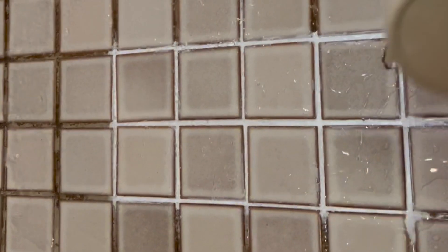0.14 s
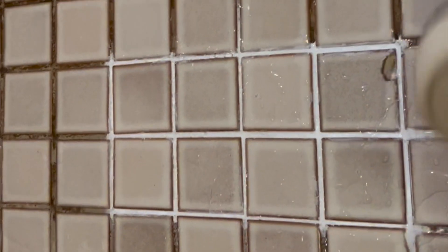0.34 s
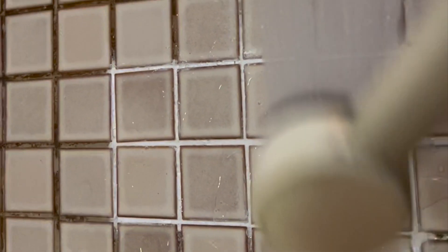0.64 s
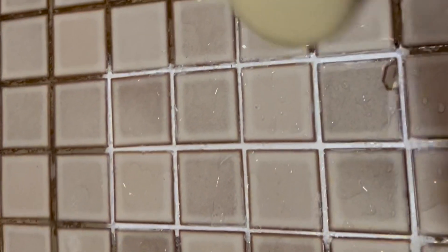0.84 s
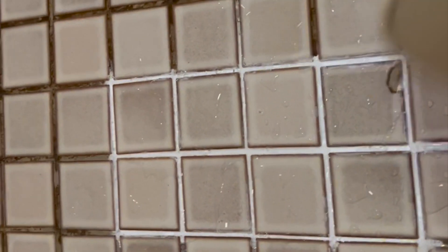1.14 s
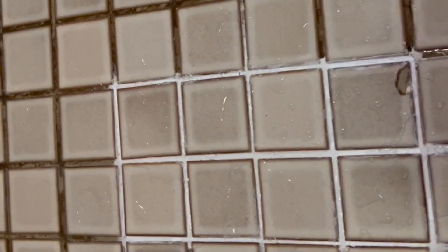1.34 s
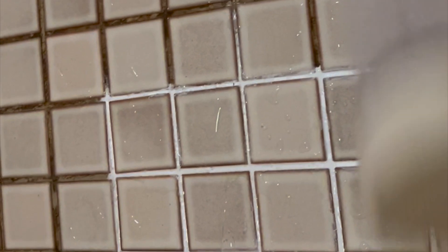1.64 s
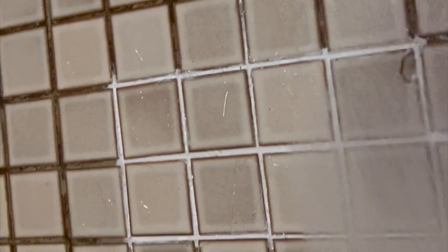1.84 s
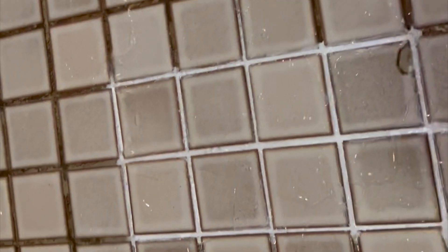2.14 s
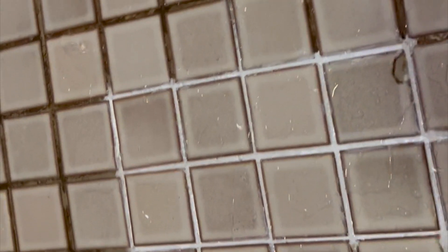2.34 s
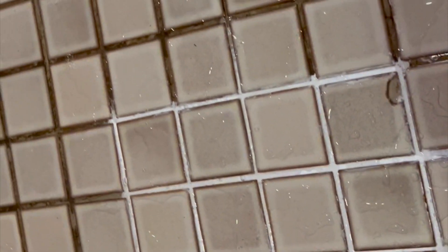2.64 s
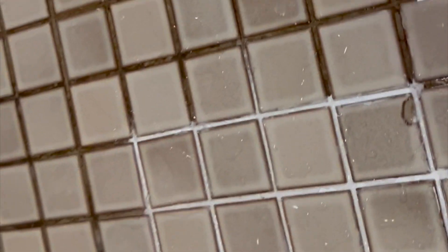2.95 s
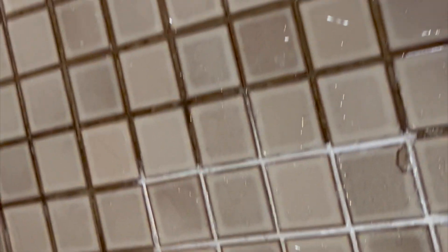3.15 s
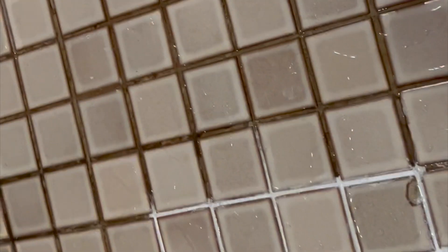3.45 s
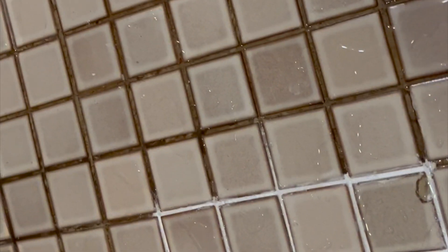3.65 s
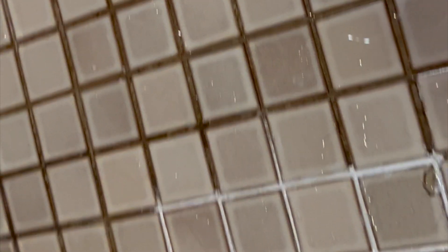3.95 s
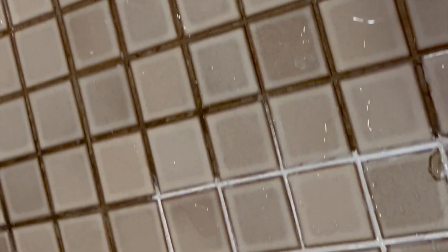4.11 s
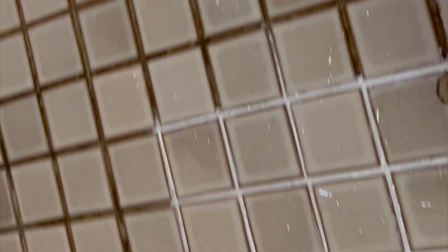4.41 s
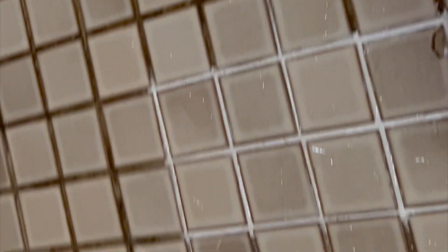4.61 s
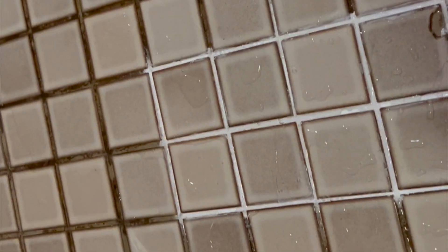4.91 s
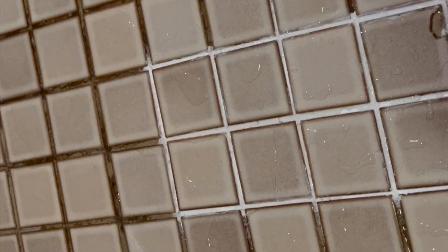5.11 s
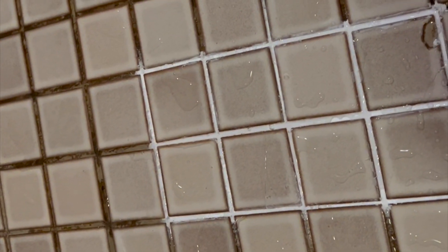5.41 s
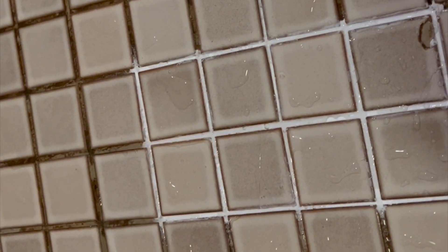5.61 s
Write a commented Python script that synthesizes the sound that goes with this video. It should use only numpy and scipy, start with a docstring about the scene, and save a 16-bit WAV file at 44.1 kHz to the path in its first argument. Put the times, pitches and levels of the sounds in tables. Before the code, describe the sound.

A shower hisses and patters in swells on bathroom tiles, then shuts off with sharp clacks, leaving drips and hollow plastic knocks in a boomy room.

```python
"""A shower hisses and patters on a tiled bathroom floor in swells, then is shut off; water drips and runs away.
A hollow plastic vessel knocks on the tiles, the valve clacks shut, and the small hard room booms and answers.
Water is shaped noise, lumpy in time and pitch; knocks are rough pushes into resonances; drops are short notes.
Two microphone ports hear it all with a phase, level and likeness that depend on frequency."""
import sys
import numpy as np
from scipy import signal
from scipy.fft import rfft, irfft, next_fast_len
from scipy.io import wavfile
from scipy.ndimage import uniform_filter1d

SR = 44100
rng = np.random.default_rng(int(sys.argv[2]) if len(sys.argv) > 2 else 0)


def to_wav(sig):
    """Store sig (one row per channel, or 1-D mono) as 16-bit WAV at the path in sys.argv[1].

    Samples outside -1..1 are clipped; the rate is SR.
    """
    pcm = np.clip(np.atleast_2d(sig), -1, 1) * 32767
    pcm = np.round(pcm).astype(np.int16)
    wavfile.write(sys.argv[1], SR, pcm.T)  # frames by channels


N = 254452

# the jet's strength: (time [s], mist level before the swells of the passes [dB])
FLOW = [(0, -31.5), (.24, -38.5), (.55, -37), (.9, -38), (1.14, -34), (1.3, -37), (1.42, -39.5),
        (1.56, -42.5), (1.68, -36), (1.85, -36), (2.2, -39), (2.38, -41.5), (2.6, -39.5), (2.9, -41),
        (3.17, -41), (3.28, -34.5), (3.4, -38), (3.49, -40), (3.52, -47), (3.57, -53.5), (3.64, -63.5),
        (3.75, -63)]
# passes of the jet across the near tiles: (peak time [s], build-up [s], leaving [s],
# mist swell [dB], patter level at the peak [dB], first pitch [Hz], last pitch [Hz])
PASSES = [(.13, 0.14, 0.13, -0.5, -48.5, 3800, 3130), (.31, 0.081, 0.061, 4, -70, 3600, 3600),
          (.47, 0.18, 0.025, 2.5, -55.5, 3700, 3600), (.78, 0.25, 0.081, 3.5, -43.5, 4300, 2920),
          (.97, 0.029, 0.26, 0.5, -55, 3620, 3600), (1.2, 0.065, 0.075, 5, -46.5, 3900, 3280),
          (1.27, 0.1, 0.17, -0.5, -37.5, 2780, 2500), (1.7, 0.03, 0.14, -1, -51.5, 2800, 2620),
          (1.952, 0.12, 0.081, 4, -45, 3340, 2060), (2.1, 0.3, 0.22, 4.5, -41.5, 3280, 3150),
          (2.318, 0.079, .03, 4.5, -46, 2850, 2660), (2.6, 0.013, .08, -2, -47.5, 2500, 2220),
          (3.07, 0.048, 0.088, -1.5, -54, 2740, 2520), (3.3, 0.047, 0.039, 1, -43, 3600, 3450),
          (3.465, 0.05, 0.067, 4, -42.5, 2800, 2420)]
# knocks of the vessel on the tiles and of the shutting valve: (time [s], crack [dB], hollow ring [dB],
# thud [dB], boom [dB], struck note [Hz], contact decay [s], crack dullness [dB per octave],
# ring damping [times its free width])
KNOCKS = [(.962, -41, -39, -51, -45, 1650, 0.028, 10, 0.82),
          (1.322, -35.5, -38, -38, -33.5, 1110, 0.0034, 15, 1.7),
          (2.1419, -23.5, -23, -31.5, -21, 1120, 0.0044, 4, 4.5),
          (2.1507, -31, -34, -36, -46, 1310, 0.01, 13, 3.3),
          (2.589, -50, -41, -54, -55, 1360, 0.031, -6.5, 1.1),
          (3.226, -30, -49, -25.5, -35, 1580, 0.0047, 9.5, 1.5),
          (3.299, -15.5, -37, -62, -29.5, 900, 0.003, 0.5, 1.6),
          (3.3016, -18.5, -38, -46, -39, 2040, 0.0058, 3, 1.5),
          (3.3085, -22.5, -27.5, -40, -48, 950, 0.0037, 1, 1.4),
          (3.317, -24, -36, -40.5, -49, 970, 0.012, 4, 1.5),
          (3.6106, -53, -47, -55, -42.5, 1370, 0.0077, 23, 1.5),
          (3.633, -67, -50, -70, -59, 1670, .012, 0, 1.2),
          (3.8843, -44, -48, -57, -54, 1360, 0.0037, 5.5, 0.88),
          (4.0917, -17.5, -23, -30, -44, 1480, 0.0015, 4, 0.67),
          (4.1056, -44, -23.5, -37.5, -40, 1670, 0.0041, 2, 0.47),
          (4.3026, -41, -45, -57, -54, 1670, 0.015, -17, .4),
          (4.303, -60, -43, -64, -60, 1360, .015, 5, 0.32), (4.31, -53, -49, -65, -60, 884, 0.016, 10, .6),
          (4.319, -61, -45, -70, -62, 355, 0.011, 12, 1.2),
          (4.356, -23.5, -21.5, -31.5, -24.5, 1150, 0.0039, 11, 2.8),
          (4.3718, -34, -31, -50, -46, 930, 0.007, 3, 4.3), (4.431, -44, -46, -46, -58, 355, 0.017, 6, 1.4),
          (4.569, -55, -46, -55, -62, 1420, 0.0045, 20, .7),
          (4.593, -54, -43, -66, -58, 1400, .01, 15, 1.6),
          (4.612, -39, -32, -48, -51, 1560, 0.008, 16, 1.9),
          (4.6344, -35.5, -30, -37.5, -52, 1160, 0.0044, 6, 1.4),
          (4.636, -58, -38.5, -49, -62, 1610, 0.0033, 2, 1.5),
          (4.662, -48, -35.5, -51, -60, 1180, 0.0032, 10, 1.2),
          (4.8443, -72, -51, -65, -73, 1020, 0.0037, 1, 1.2),
          (4.898, -64, -51, -57, -53, 1040, 0.006, 18, 0.75),
          (5.081, -43.5, -50, -57.5, -74, 910, 0.029, -4.5, 3.5),
          (5.12, -47, -44.5, -59, -64, 1100, 0.006, 13, 2.4),
          (5.19, -55, -50.5, -62, -66, 1540, 0.073, 20, 3.1),
          (5.3305, -36.5, -33, -43, -35.5, 960, 0.0025, 10.5, 1.6),
          (5.4002, -23.5, -18.5, -28.5, -37, 1040, 0.001, 4, 0.86),
          (5.425, -40, -33, -35.5, -48, 1040, .004, 8, 0.92),
          (5.463, -55, -34.5, -39, -47, 1040, 0.0083, 15, 1.1),
          (5.4992, -32.5, -33.5, -44, -33.5, 1130, 0.0039, 11, 1.8),
          (5.687, -58, -35, -54, -52, 1000, 0.0044, 25, 1.4)]
# left-over water running off: (time [s], guide level for the runoff and its droplets [dB])
TRICKLE = [(3.5, -47), (3.58, -56.5), (3.74, -64), (3.9, -61), (4.3, -61), (4.6, -60), (4.95, -69),
           (5.36, -61.5), (5.77, -70)]


def amp(db):
    """Gain of a level in dB."""
    return 10 ** (np.asarray(db) / 20)


def unit(x):
    """Bring x to rms 1."""
    return x / np.sqrt(np.mean(x ** 2) + 1e-20)


def peak(x):
    """Bring x to peak 1."""
    return x / np.abs(x).max()


def along(points, hz):
    """Read a curve of (Hz, value) points on a log frequency axis."""
    f, v = np.transpose(points)
    return np.interp(np.log(hz + 1), np.log(f + 1), v)


def spectrum(points):
    """Gain curve through (Hz, dB) points."""
    return lambda hz: amp(along(points, hz))


def automation(points):
    """Draw a line through (s, value) points, one value per sample."""
    s, value = np.transpose(points)
    return np.interp(np.arange(N) / SR, s, value)


def filtered(x, response):
    """Filter x by a complex response of frequency, zero-padded against wrap-around."""
    n = x.shape[-1]
    m = next_fast_len(n + 8192)
    return irfft(rfft(x, m) * response(np.fft.rfftfreq(m, 1 / SR)), m)[..., :n]


def modes(table):
    """Causal response of (Hz, width Hz, dB) resonances with alternating sign."""
    def response(f):
        total = 0
        for k, (centre, width, db) in enumerate(table):
            resonance = 1j * f * width / (centre * centre - f * f + 1j * f * width)
            total = total + (-1) ** k * amp(db) * resonance
        return total
    return response


def lumpy_noise(response, patchy_db, grainy_db):
    """Two strands of noise at rms 1: millisecond grains of random level, then patches in time and pitch."""
    lumps = uniform_filter1d(rng.standard_normal((2, N)), size=40, axis=1)
    grains = rng.standard_normal((2, N)) * amp(grainy_db * unit(lumps))
    z = signal.stft(grains, nperseg=512)[2]
    field = uniform_filter1d(rng.standard_normal(z.shape[1:]), size=8, axis=0)
    field = uniform_filter1d(field, size=10, axis=1)
    patched = signal.istft(z * amp(patchy_db * unit(field)), nperseg=512)[1][:, :N]
    return unit(filtered(patched, response))


def add(out, s, sound):
    """Mix a sound in from time s."""
    part = out[:, round(s * SR):][:, :sound.shape[1]]
    part += sound[:, :part.shape[1]]


def in_room(dry, wet_db):
    """Direct sound on the shared strand, plus a fresh diffuse tail on both as the tiles throw it back."""
    # decay of the tiled room: (frequency [Hz], time to fall 60 dB [s])
    decay = [(100, 0.46), (500, 0.31), (2000, 0.32), (6000, 0.25), (15000, 0.19)]
    hz, t, z = signal.stft(rng.standard_normal((2, len(dry))), SR, nperseg=256)
    fading = amp(-60 * t / along(decay, hz)[:, None])
    tail = signal.istft(z * fading, SR, nperseg=256)[1][:, :len(dry)]
    tail = np.pad(tail / np.linalg.norm(tail[0]), ((0, 0), (150, 0)))  # the tail starts 3.4 ms late
    wet = signal.fftconvolve(dry[None], tail, axes=1)[:, :len(dry)]
    return dry * [[1], [0]] + amp(wet_db) * wet


def nearness(t):
    """How far each pass of the jet has come at times t: 0 away, 1 at its peak."""
    return np.array([np.interp(t, [s - build, s, s + leave], [0, 1, 0])
                     for s, build, leave, *_ in PASSES])


def gliding(x):
    """Centre the patter on a pitch that slides as each pass moves over the floor."""
    times, pitches = [], []
    for top, build, leave, _, _, first_hz, last_hz in PASSES:
        times += [top - build, top + leave / 2]
        pitches += [first_hz, last_hz]
    hz, t, z = signal.stft(x, SR, nperseg=512)
    centre = np.interp(t, np.maximum.accumulate(times), pitches)
    octaves = np.log2((hz[:, None] + 1) / centre)
    gain_db = np.where(octaves < 0, 45 * octaves, -16 * octaves)  # steep below, a long skirt above
    return signal.istft(z * amp(gain_db), SR, nperseg=512)[1][:, :N]


def spray():
    """Fine mist hisses with the flow; drops striking the floor patter louder as the jet passes near."""
    # colour of the mist: (frequency [Hz], relative level per Hz [dB])
    mist_colour = [(900, -41), (1800, -10), (2600, -11.5), (3500, -10), (5500, -4.5), (7500, -1.5),
                   (9500, -4), (11500, 0.5), (14000, -6.5), (15800, -1)]
    patter_range_db, rest_patter_db = 6, -23  # extra swing in a pass; patter relative to flow between passes
    t = np.arange(N) / SR
    flow_db, near = automation(FLOW), nearness(t)
    swell_db, patter_db = np.transpose(PASSES)[3:5, :, None]
    running = np.arange(N) < FLOW[-1][0] * SR
    mist = lumpy_noise(spectrum(mist_colour), patchy_db=2.0, grainy_db=1.73)
    mist_level = amp(flow_db + (swell_db * near).sum(0))
    patter = unit(gliding(lumpy_noise(lambda f: f > 800, patchy_db=1.2, grainy_db=2)))
    pass_levels = np.sqrt(near) * amp(patter_db - patter_range_db * (1 - near))
    patter_level = amp(flow_db + rest_patter_db) + pass_levels.sum(0)
    return running * (mist_level * mist + patter_level * patter)


def knocks():
    """Each contact is a rough push: it cracks, rings hollow notes near the struck one and kicks the room modes."""
    # hollow notes: (frequency [Hz], free width [Hz], level before focus on the struck note [dB])
    hollow_notes = [(355, 18, 4), (654, 57, 0), (806, 39, -14), (884, 54, -7.5), (1040, 59, -3),
                    (1163, 28, -3), (1360, 67, 0), (1567, 64, -13), (1670, 32, -5), (1790, 190, -7),
                    (2040, 16, -10)]
    # hard notes over the crack: (frequency [Hz], width [Hz], level before dulling [dB])
    rim_notes = [(2140, 270, -5.5), (2500, 24, -34), (2920, 190, -18), (3440, 110, 13.5), (4400, 430, -1),
                 (4920, 39, 13), (5700, 440, -1)]
    # lowest room modes: (frequency [Hz], width [Hz], relative level [dB])
    boom_modes = [(69.6, 5.3, -9.5), (131, 33, -18.5)]
    # next room modes: (frequency [Hz], width [Hz], relative level [dB])
    thud_modes = [(167, 40, -6.5), (272.7, 30, -2.5), (348, 11.6, -1), (463, 38, -6)]
    room_lag_s = 0.0062  # the low room modes answer this late
    rim_loss_db, focus_db = 1.3, 45  # rim lost per dB of dullness; ring lost per octave off the struck note

    def vary(centre, spread):
        return centre * (1 + spread * rng.normal())

    out, t = np.zeros((2, N)), np.arange(SR // 2) / SR
    for s, crack_db, ring_db, thud_db, boom_db, ring_hz, contact_s, dull_db, damping in KNOCKS:
        push = rng.standard_normal(len(t)) * np.exp(-t / contact_s)

        rim = modes([(vary(c, .02), w, db + rng.normal(0, 3) - rim_loss_db * max(dull_db, 0))
                     for c, w, db in rim_notes])

        def edge(f):
            tilt = amp(-dull_db * np.log2(f / 4000 + 0.25))
            band = 1j * f / (1500 + 1j * f) / (1 + 1j * f / 11000) ** 3
            return tilt * band * (1 + rim(f))

        snap = peak(filtered(1. * (t == t[64]), edge))  # first hard touch, with room for its pre-ring
        scuff = peak(filtered(push, edge))  # the contact settling

        struck = [(vary(c, .005), w * damping,
                   db + rng.normal(0, 1.5) - focus_db * abs(np.log2(c / ring_hz))) for c, w, db in hollow_notes]
        ring = peak(filtered((t == 0) + 0.15 * push, modes(struck)))

        thud_room = modes([(vary(c, .018), w, db + rng.normal(0, 1.0)) for c, w, db in thud_modes])
        soft_push = np.abs(push) * (1 - np.exp(-t / 0.0012))
        thud = peak(filtered(soft_push, thud_room))
        boom = peak(filtered(np.abs(push), modes(boom_modes)))

        add(out, s, in_room(amp(ring_db) * ring, wet_db=-2.0))
        add(out, s + room_lag_s, in_room(amp(thud_db) * thud, wet_db=3.0))
        add(out, s - t[64], in_room(amp(crack_db) * snap, wet_db=10.0))
        add(out, s, amp(crack_db) * scuff * [[1], [.3]])
        add(out, s + room_lag_s, amp(boom_db) * boom * [[1], [.2]])
    return out


def drips():
    """A broad tick on the wet tile and a short bubble whose pitch rises as it nears the surface."""
    # single drips: (time [s], bubble peak [dB], tick peak [dB], nominal bubble pitch [Hz])
    drops = [(0.2994, -35.5, -37, 1940), (.38, -44, -40, 2000), (.455, -41, -40, 2300),
             (0.829, -40, -40, 3020), (1.355, -33, -38, 5600), (2.652, -35.5, -22, 5950),
             (3.219, -34.5, -36, 3230), (3.595, -52, -60, 2220), (3.7186, -60, -35, 6030),
             (3.774, -67, -20.5, 3360), (3.8477, -40.5, -25, 7100), (3.8644, -54, -44, 6800),
             (3.926, -54, -38, 2740), (3.998, -50, -36, 8000), (4.0416, -56, -54, 2300),
             (4.2197, -59, -32, 7400), (4.512, -54, -46, 2270), (4.5718, -47, -55, 3060),
             (4.59, -40, -57, 2420), (4.74, -55, -60, 4800), (4.8226, -52, -35.5, 3800),
             (4.905, -59, -62, 2340), (4.9213, -57, -46, 3020), (4.9538, -85, -35, 7300),
             (4.985, -56, -58, 2350), (5.041, -59, -58, 2470), (5.13, -56, -50, 2390),
             (5.184, -51, -47, 2340), (5.206, -50.5, -38, 5960), (5.285, -60, -60, 3540),
             (5.6022, -57, -60, 3550), (5.646, -65, -42, 2400), (5.669, -74, -42, 7140)]
    bubble_s = .0013  # time to the bubble's loudest point
    out, t = np.zeros((2, N)), np.arange(SR // 3) / SR
    for s, bubble_db, tick_db, hz in drops:
        u = t / bubble_s
        rising = .98 + .01 * np.minimum(u, 5)
        bubble = u * np.exp(1 - u) * np.sin(2 * np.pi * hz * t * rising)
        # the film snapping shut: a rising chirp over a broad click
        splat = t / .0002 * np.exp(-t / .0002) * np.sin(2 * np.pi * hz * t * (.8 + t / .0015))
        click = filtered(1. * (t == 0), modes([(3.56 * hz, 5.2 * hz, 0)]))
        tick = peak(splat + 1.6 * click)
        add(out, s, in_room(amp(bubble_db) * bubble + amp(tick_db) * tick, wet_db=-1.0))
    return out


def plop():
    """A big drop's cavity closes fast, so its note sweeps up in a few milliseconds."""
    # big drops: (time [s], peak [dB], first pitch [Hz], last pitch [Hz], length [s])
    big_drops = [(3.774, -30, 1670, 7500, 0.0052)]
    out, t = np.zeros((2, N)), np.arange(SR // 3) / SR
    for s, db, first_hz, last_hz, length in big_drops:
        u = np.minimum(t / length, 1)
        phase = 2 * np.pi * np.cumsum(first_hz * (last_hz / first_hz) ** u) / SR
        note = np.sin(np.pi * u ** 1.1) * np.sin(phase)
        add(out, s, in_room(amp(db) * note, wet_db=-4.0))
    return out


def trickle():
    """Thin water creeping to the drain: noise in very uneven grains and patches."""
    # colour of the runoff: (frequency [Hz], relative level per Hz [dB])
    runoff_colour = [(500, 7), (1100, 9), (2500, 10.5), (5000, 10), (8000, 6.5), (12000, 3), (15800, -6.5)]
    runoff = lumpy_noise(spectrum(runoff_colour), patchy_db=4, grainy_db=4)
    return amp(automation(TRICKLE) - 1.5) * runoff


def droplets(count=220):
    """Tiny scattered drops in the runoff: short damped notes of random size and pitch."""
    out, t = np.zeros((2, N)), np.arange(SR // 40) / SR
    start = TRICKLE[0][0]
    level_db = automation(TRICKLE)
    for when, pitch, size, side in rng.random((count, 4)):
        s = start + when * (N / SR - start - .03)
        hz = 1700 * 4.5 ** pitch
        note = np.sin(2 * np.pi * hz * t) * np.exp(-t * hz / 4) * (1 - np.exp(-t / .0003))
        size_db = 7 - 4 * np.log(size + 3e-2)  # many small, a few much louder
        add(out, s, amp(level_db[round(s * SR)] + size_db) * note * [[1], [2 * side - 1]])
    return out


def drumming():
    """Floor and pipes hum into the room's low modes, die after the valve shuts, and are stirred by knocks."""
    # level of the room's lowest boom: (time [s], level [dB])
    bass = [(0.0, -57), (0.51, -56.5), (0.64, -58), (2.22, -52.5), (2.33, -53.5), (3.05, -51), (3.33, -36),
            (3.5, -51), (3.7, -55), (3.94, -59), (4.15, -69), (4.29, -50), (4.95, -63), (5.37, -60.5),
            (5.5, -56), (5.77, -58)]
    # colour of the drumming: (frequency [Hz], relative level per Hz [dB])
    drum_colour = [(130, -35), (190, -0.5), (290, -2.5), (360, 2.5), (460, 0), (600, -4.5), (1000, -6),
                   (1600, -11), (2500, -23.5), (5000, -61)]
    shut_s, hum_die, drum_die = 3.21, 50, 96  # the valve closes; fall of each after it [dB per s]
    hum_db, drum_db, follow = -53, -47.5, 0.45  # levels at full flow; dB they lose per dB of flow
    hum_quiet_db, drum_quiet_db = -67, -69.5  # what is left of the two in the still room
    hum_stir_db, drum_stir_db, stir_t60 = -15.5, -26, 0.16  # stir under a knock's boom and thud; decay [s]
    t, flow_db = np.arange(N) / SR, automation(FLOW)
    held_flow_db = np.where(t < shut_s, flow_db, flow_db[round(shut_s * SR)])
    loss_db = follow * (held_flow_db - flow_db.max())
    since_shut = np.maximum(t - shut_s, 0)
    hum_level = amp(hum_db + loss_db - hum_die * since_shut) + amp(hum_quiet_db)
    drum_level = amp(drum_db + loss_db - drum_die * since_shut) + amp(drum_quiet_db)
    for s, _, _, thud_db, boom_db, *_ in KNOCKS:
        stir = (t > s) * amp(-60 * np.abs(t - s) / stir_t60)
        hum_level += amp(boom_db + hum_stir_db) * stir
        drum_level += amp(thud_db + drum_stir_db) * stir
    boom = lumpy_noise(lambda f: modes([(72, 45, 0)])(f) ** 2, patchy_db=2.0, grainy_db=5.5)
    hum = lumpy_noise(lambda f: modes([(118, 30, 0)])(f) ** 2, patchy_db=2.0, grainy_db=4.0)
    drum = lumpy_noise(spectrum(drum_colour), patchy_db=2.5, grainy_db=0.3)
    whistle = lumpy_noise(modes([(1566, 45, 0)]), patchy_db=.8, grainy_db=1.0)  # a faint note of the pipe
    return amp(automation(bass)) * boom + hum_level * hum + drum_level * (drum + amp(-10.0) * whistle)


def thinned(x):
    """Thin the water's sound in a narrow band that slides down three times."""
    # sliding thin bands: (start [s], end [s], first frequency [Hz], last frequency [Hz], greatest depth [dB])
    thin_bands = [(.07, .24, 2750, 2250, 22), (.57, .84, 3080, 2280, 20), (1.1, 1.36, 2280, 1980, 16)]
    hz, t, z = signal.stft(x, SR, nperseg=1024)
    for start, end, first_hz, last_hz, depth_db in thin_bands:
        u = np.clip((t - start) / (end - start), 0, 1)
        octaves = np.log2((hz[:, None] + 1) / (first_hz * (last_hz / first_hz) ** u))
        strength = np.sqrt(np.abs(np.sin(np.pi * u)))  # comes and goes
        z = z * amp(-depth_db * strength * np.exp(-(octaves / .085) ** 2))
    return signal.istft(z, SR, nperseg=1024)[1][:, :N]


def scene():
    """The shared strand reaches both ports with a phase and level offset; the other makes them differ."""
    # likeness of the two ports: (frequency [Hz], correlation, held to 0.93 at most)
    likeness = [(60, 1), (290, 0.87), (640, 0.72), (1400, 0.13), (3000, 0.23), (5500, 0.22), (7200, 0.82),
                (15000, 1)]
    # phase by which the left port leads: (frequency [Hz], lead [radians])
    lead = [(300, -.2), (650, -.9), (1040, -1.9), (1500, -1.1), (2500, -.4), (4100, -.8), (5700, 0),
            (7600, 0), (9500, 3.14), (12000, 6.28), (14300, 9.42), (16300, 12.56)]
    # balance of the ports: (frequency [Hz], left over right [dB])
    balance = [(60, -2), (300, -3), (1200, 1.5), (4000, -4.5), (8000, -0.5)]
    water = thinned(spray() + drumming()) + trickle() + droplets()
    shared, other = water + knocks() + drips() + plop()

    def turn(hz):
        return np.arccos(np.clip(along(likeness, hz), 0, .93)) / 2

    def port(hz, way):
        return amp(way * along(balance, hz) / 2) * np.exp(way * .5j * along(lead, hz))

    ports = []
    for way in (1, -1):  # left, right
        common = filtered(shared, lambda hz: port(hz, way) * np.cos(turn(hz)))
        apart = filtered(other, lambda hz: port(hz, way) * np.sin(turn(hz)))
        ports.append(common + way * apart)
    return np.array(ports)


def record(dry):
    """The microphone rolls off the deepest bass; the recorder keeps nothing above its band limit."""
    top_hz = 15850
    return filtered(dry, lambda hz: (1j * hz / (42 + 1j * hz)) ** 2 * (hz < top_hz))


dry = scene()
out = record(dry)
to_wav(out)
```